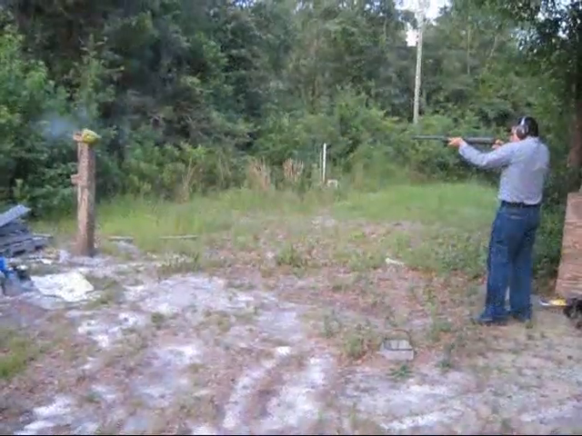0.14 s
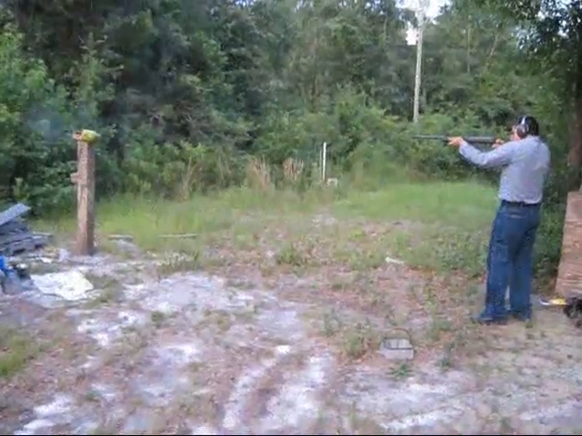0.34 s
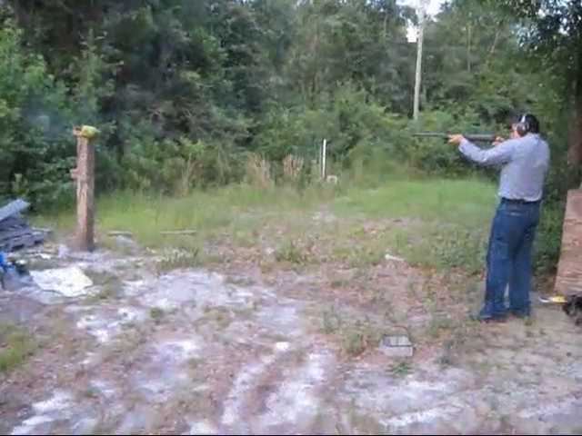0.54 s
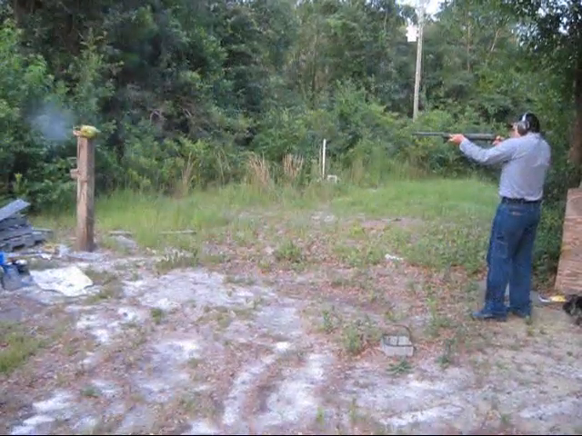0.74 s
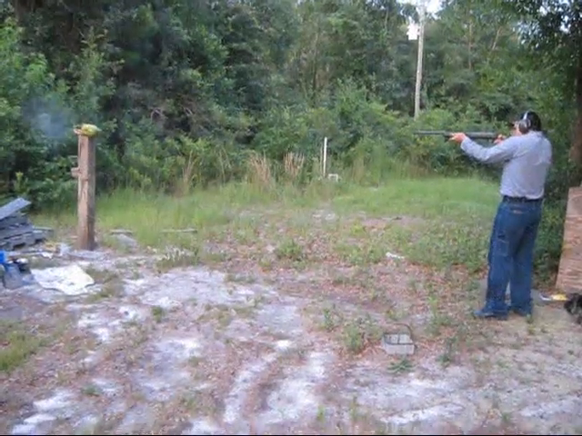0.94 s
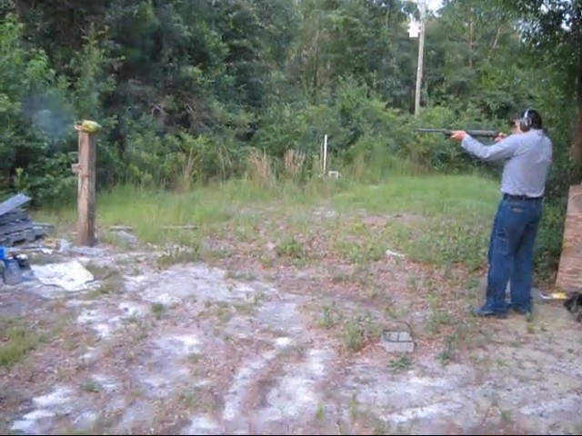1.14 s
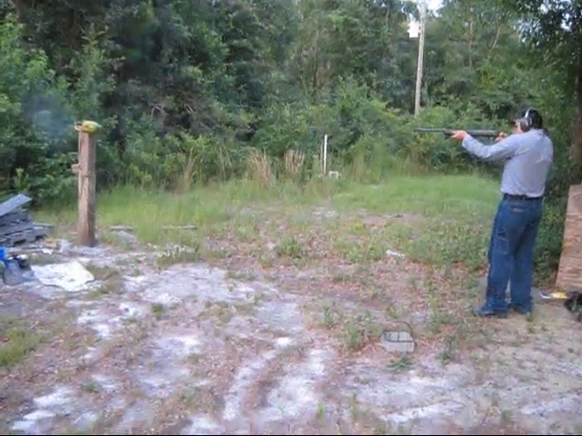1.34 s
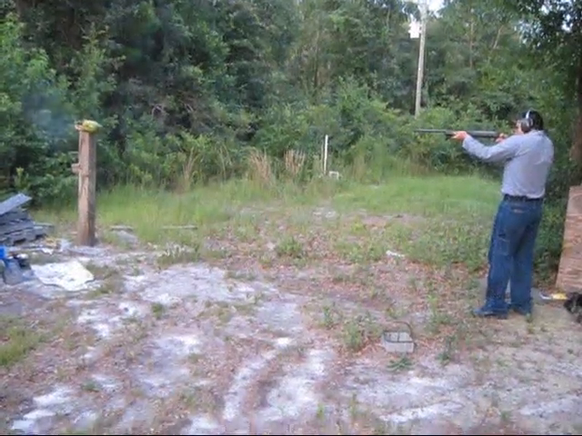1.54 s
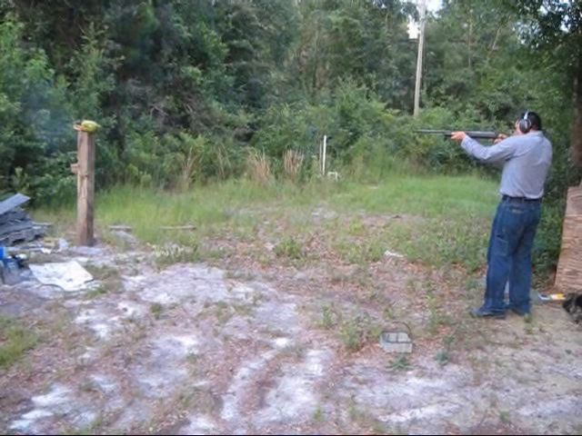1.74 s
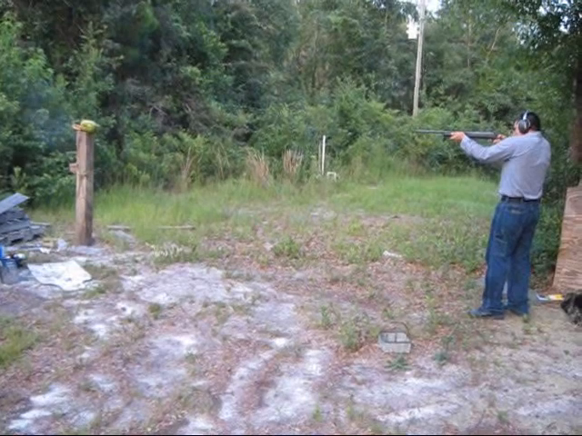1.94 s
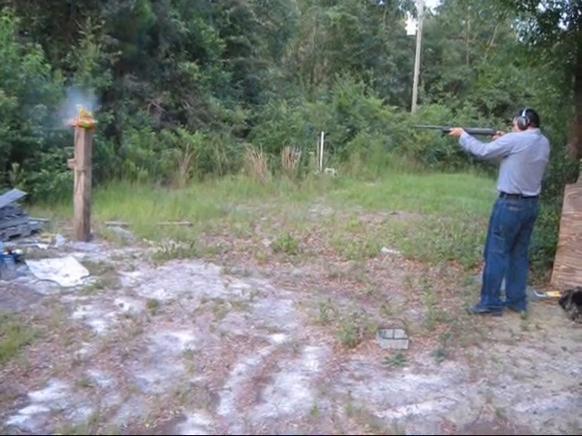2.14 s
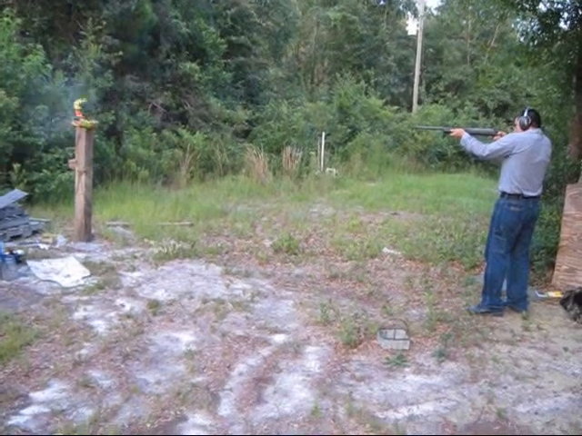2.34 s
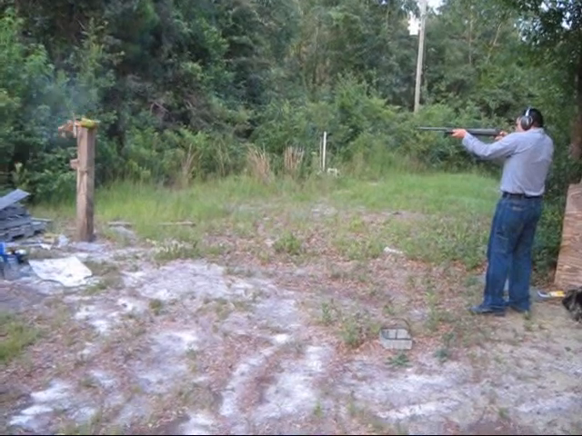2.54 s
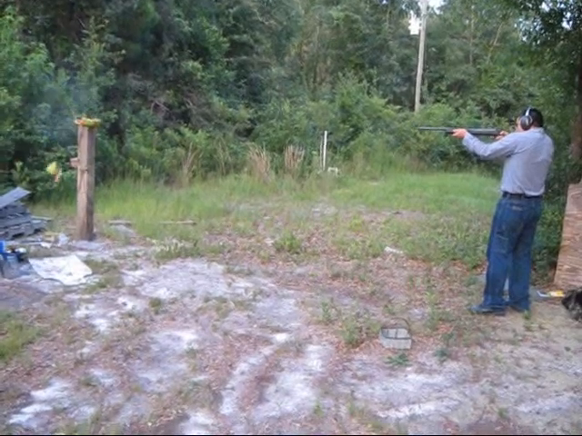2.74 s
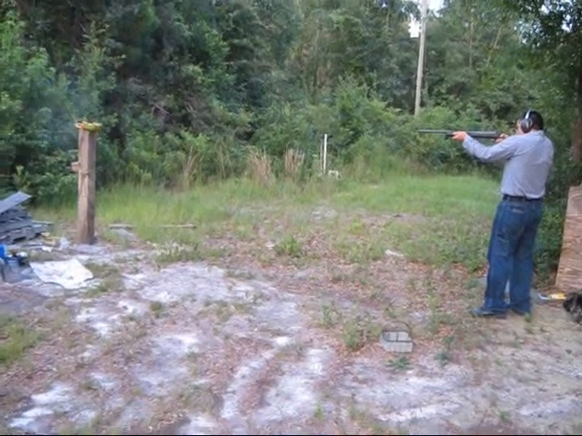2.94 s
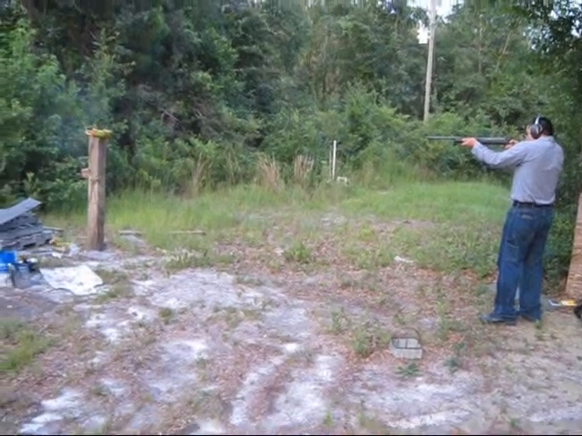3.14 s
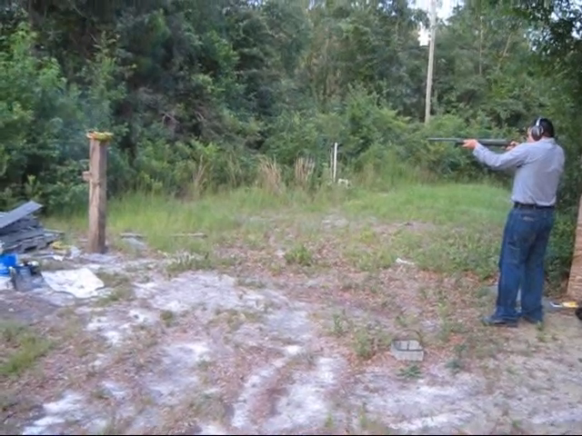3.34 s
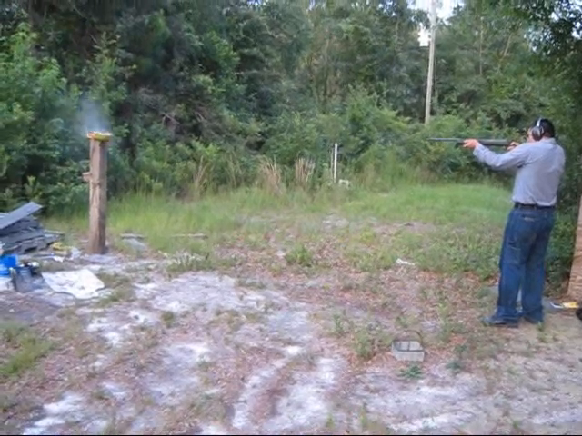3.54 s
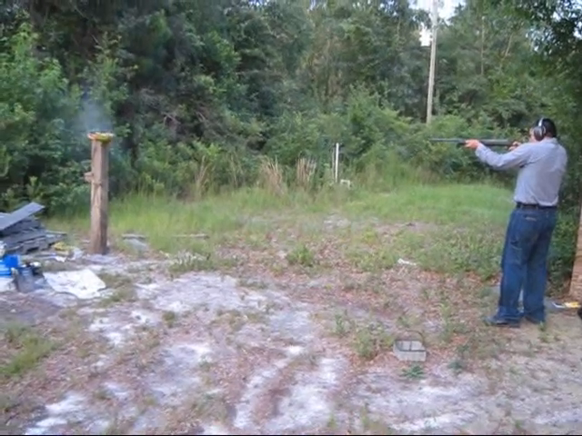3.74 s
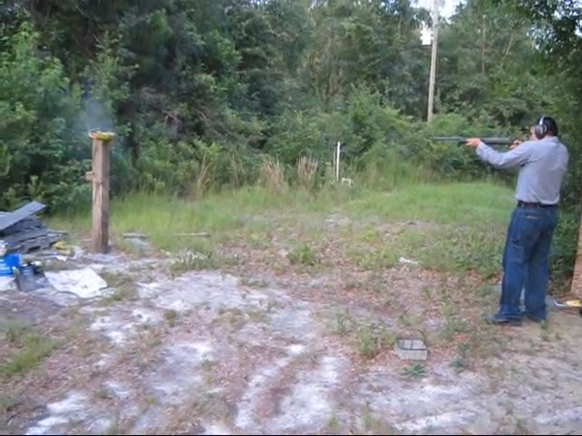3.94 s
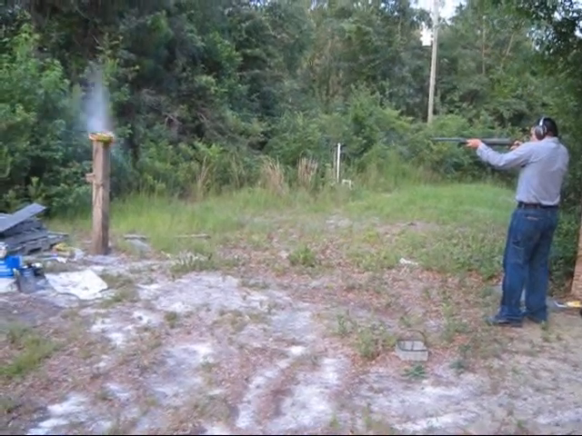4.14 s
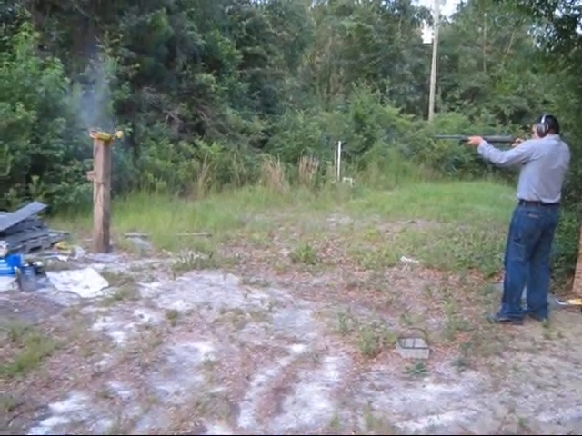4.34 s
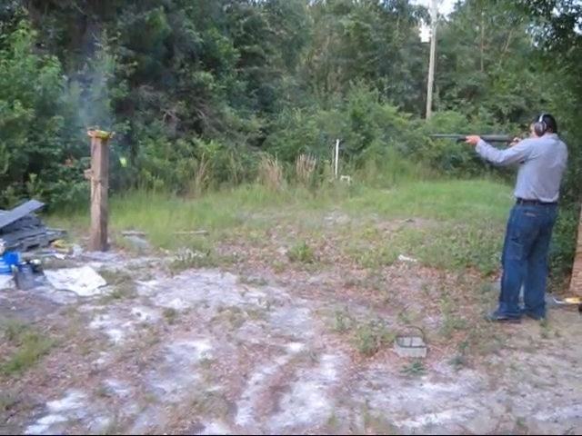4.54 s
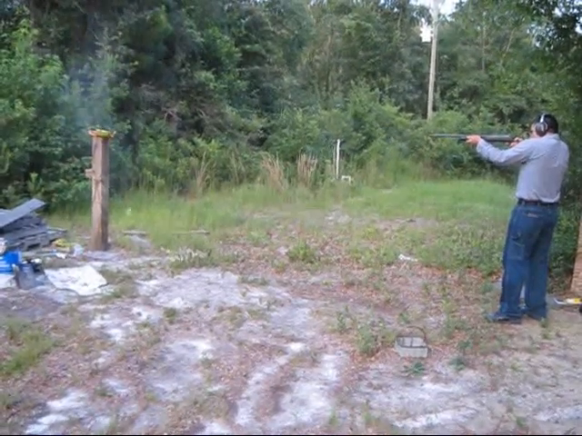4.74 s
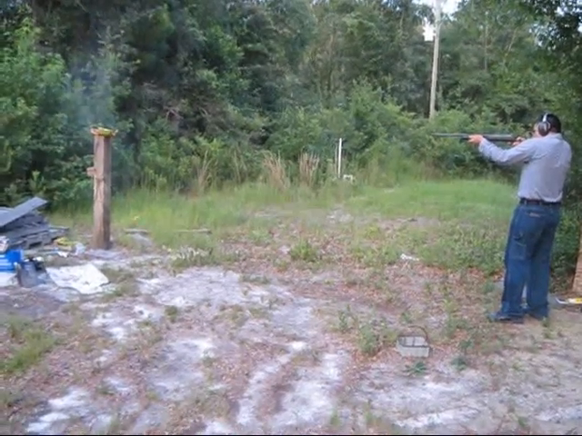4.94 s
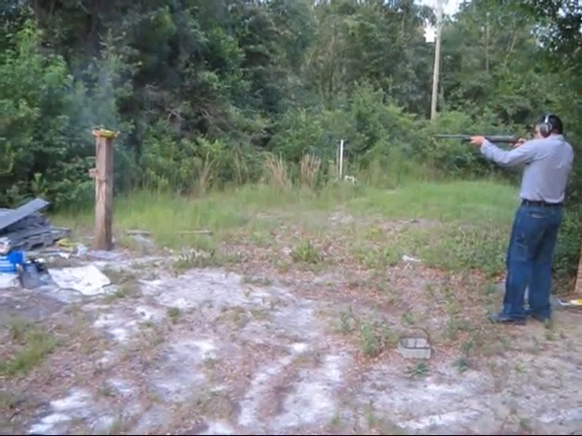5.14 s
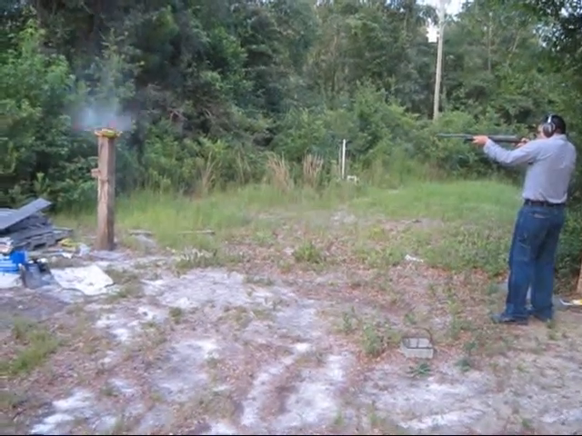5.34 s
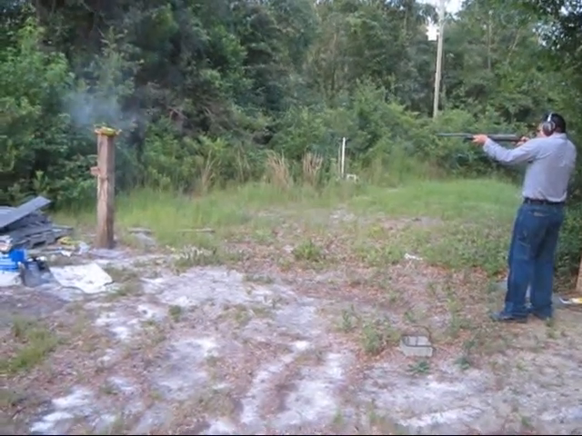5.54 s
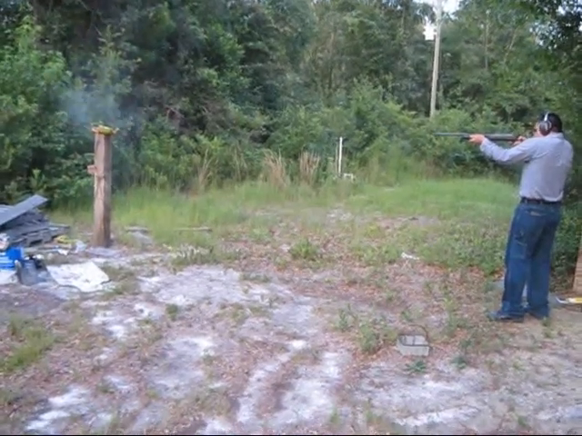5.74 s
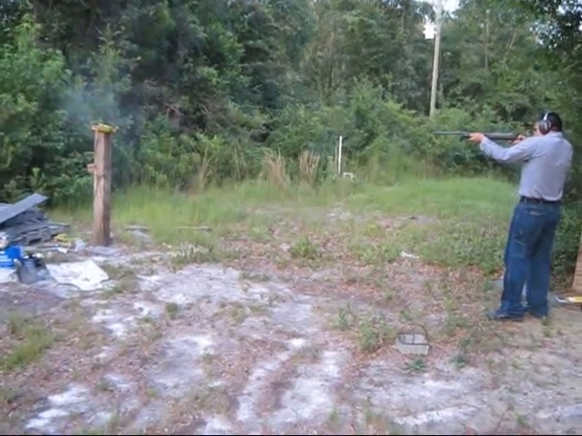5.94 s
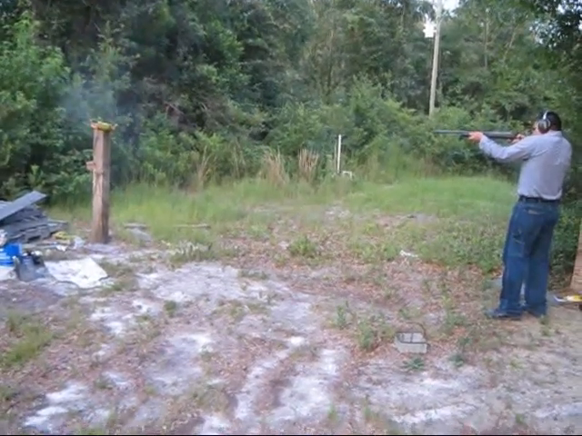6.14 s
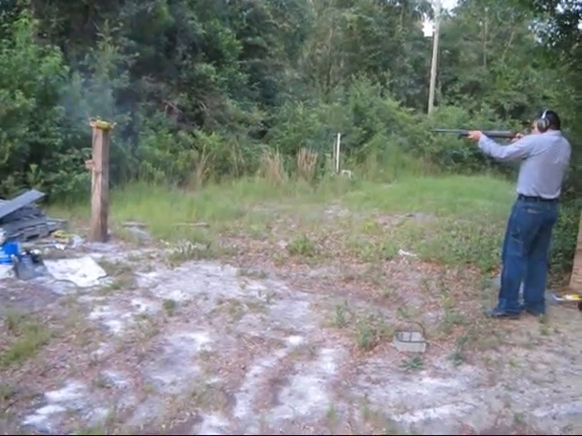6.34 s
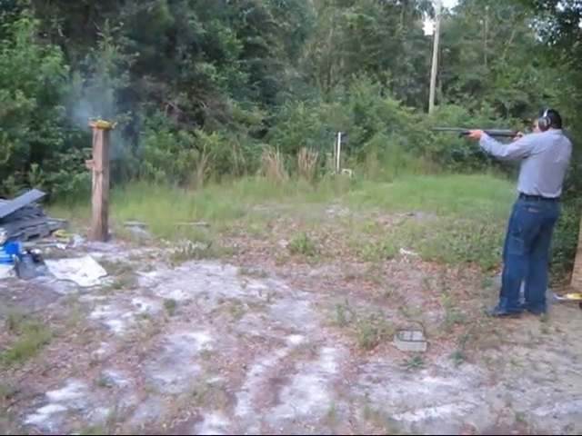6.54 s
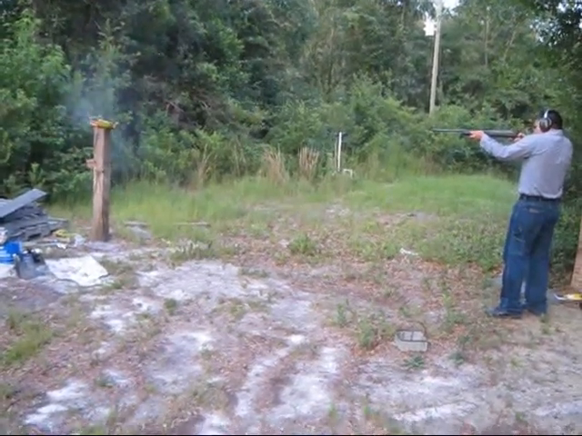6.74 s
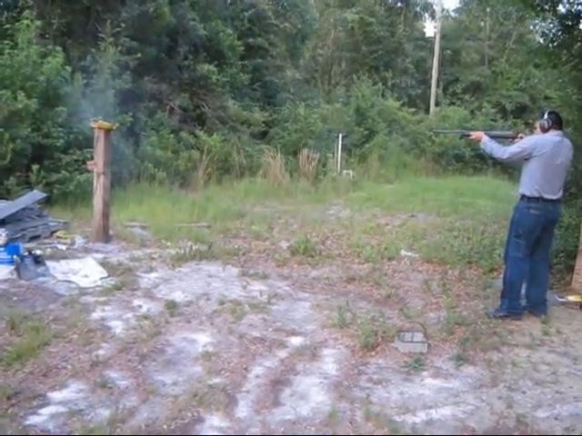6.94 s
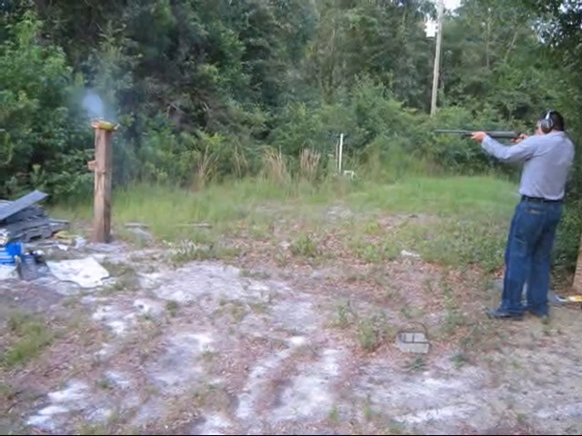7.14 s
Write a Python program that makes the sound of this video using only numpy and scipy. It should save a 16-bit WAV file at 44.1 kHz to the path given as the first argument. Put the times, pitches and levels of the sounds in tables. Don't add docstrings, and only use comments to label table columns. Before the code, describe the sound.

Nine sharp small-rifle shots crack in a wooded yard, each slapping off nearby surfaces and washing back from the trees, with small ticks between.

```python
import sys
import numpy as np
from scipy import signal
from scipy.fft import rfft, irfft
from scipy.io import wavfile
from scipy.ndimage import uniform_filter1d

SR = 44100
rng = np.random.default_rng(int(sys.argv[2]) if len(sys.argv) > 2 else 0)


def bounce(signal):
    frames = np.transpose(np.atleast_2d(signal))
    limited = np.clip(frames, -1, 1)
    pcm = np.round(limited * 32767).astype(np.int16)
    wavfile.write(sys.argv[1], SR, pcm)


def ratio_of_db(decibels):
    return 10 ** (np.asarray(decibels, float) / 20)


N = 317520

# f/Hz, density/dB per Hz
WASH_SPECTRUM = [(150, -66), (250, -29.5), (345, -21.5), (435, -14.5), (656, 0), (977, -1.5), (1310, -4.5),
                 (1510, -6.5), (1650, -6), (2030, -5), (3440, -12.5), (4940, -18.5), (5400, -16),
                 (7020, -65.5), (11900, -120)]
WASH_LIMITS_HZ = 1200, 2850, 6500
# f/Hz, density/dB per Hz
RUMBLE_SPECTRUM = [(13, -31), (22, -9.5), (27, -5), (39, -3), (54, -4), (108, -7.5), (144, -10),
                   (193, -6.5), (293, -9.5), (450, 0), (580, -23), (990, -120)]
# echo/dB, swell/s, T60/s, steady/dB
WOODS_RANGES = [
    (-14, 0.33, 3.01, -43.5),
    (-12.5, 0.12, 2.85, -47),
    (-14.5, 0.043, 1.53, -47.5),
    (-17, 0.063, .85, -38),
    (-25.5, 0.034, 0.55, -50),
]
# t/s, insect chorus/dB, breeze and traffic/dB
SWELLS = [(0, -8, 2.5), (1.2, -7.5, -4.5), (2.2, -0.5, -2), (2.85, 3, 4), (3.2, 4.5, 3.5),
          (3.6, -1.5, -1.5), (4.6, 1.5, -2), (5.2, 0, 2), (5.75, -0.5, -2), (6.05, 3.5, 4), (6.5, -4, -3),
          (7.2, 3, -1)]
# f/Hz, width/Hz, level/dB
CHORUS_BANDS = [(4070, 500, -2), (4596, 770, 3.5), (4970, 260, -4), (5526, 900, -7.5)]
# f/Hz, width/Hz, level/dB
CRICKET_BANDS = [(4450, 110, -4), (4970, 97, 0), (2380, 71, -8)]
CRICKET_START_S, CRICKET_SWELL_S, CRICKET_DB = 5.85, .25, -39.5
# t/s, f/Hz, level/dB
MOTOR_COURSE = [(4.66, 274, -68), (4.74, 255, -57), (4.86, 211, -52), (4.95, 201, -68)]
# t/s, f/Hz, level/dB
WHINE_COURSE = [(5.95, 1800, -62), (6.1, 1775, -44.5), (6.25, 1690, -39.5), (6.5, 1646, -45),
                (6.53, 1670, -70)]
# t/s, gain just after/dB, recovery/dB per s, echo sent to woods/dB, extra bass/dB
DUCKS = [(-.4, -19.5, 19, -1, 1), (0.192, -23.5, 23, 0, -2), (0.738, -21.5, 21, -0.5, -2),
         (1.254, -22, 20.5, 5, -1), (2.222, -22.5, 20.5, -0.5, 3), (2.825, -18.5, 26.5, -60, 0),
         (3.578, -22.5, 21, 0.5, -0.5), (4.219, -20.5, 18, -1.5, 2), (5.391, -20, 19, 0, -1.5),
         (6.52, -21, 21.5, 0, -1.5), (7.193, -13, 20, 0, 0)]
# t/s, peak/dB, ring f/Hz, body/dB, low knock/dB
CONTACTS = [(1.8905, -20, 3230, -26, -53), (2.8228, -11.5, 3720, -26, -33), (2.9936, -31, 4760, -33.5, -52),
            (3.02, -33, 4140, -29, -36), (3.045, -23, 5350, -41, -56), (3.052, -26, 4640, -48, -45),
            (3.1442, -26, 4580, -28, -41), (4.103, -18, 3480, -30, -53), (4.753, -21, 4500, -35, -54),
            (4.762, -23, 3620, -26.5, -56), (4.9152, -20, 4700, -28, -33), (4.92, -18.5, 4740, -42.5, -32),
            (4.997, -15.5, 3660, -29, -47), (5.0749, -16.5, 4690, -35, -39), (6.283, -32, 2650, -26.5, -48),
            (6.9574, -16.5, 3700, -43, -61), (7.06, -35, 4970, -44, -58)]
CONTACT_T60_S = .019
# t/s, thump/dB, slap ring f/Hz, ring/dB, scatter/dB
RIFLE_SHOTS = [(.191, -18.5, 2100, -11.5, -22), (.737, -18, 700, -11, -20.5),
               (1.255, -25, 1800, -33, -15.5), (2.222, -11, 660, 0.5, -21.5),
               (3.578, -16.5, 1600, -19.5, -21), (4.2205, -10, 780, -11, -19.5),
               (5.391, -7.5, 2450, -16, -21), (6.5199, -11, 1570, -14.5, -20.5),
               (7.193, -17, 1760, -21, -17)]
# delay/s, rise/s, T60/s
PATHS = [(-.0105, .0005, .012), (-.003, .0015, .03), (0, .001, .014), (.006, .001, .04),
         (.0105, .0007, .018), (.0135, .001, .07), (.023, .001, .03), (.026, .004, .12),
         (.0555, .0003, .012), (.058, .002, .1), (.067, .002, .1), (.186, .001, .05), (.226, .002, .05)]
# level/dB, centre f/Hz, width/Hz
PATH_COLOURS = [(-9, 3600, 1000), (-2, 630, 1800), (8.5, 580, 6100), (-4, 2900, 5500), (1.5, 1800, 3900),
                (4, 1460, 3600), (1.5, 1470, 6500), (-1.5, 3840, 2300), (1, 2260, 1000), (-8.5, 2700, 980),
                (-5.5, 1900, 3900), (-14, 1500, 4600), (-23, 500, 1800)]
LEAD_S, PATHS_DB = .012, -11.5
# noise index, low f/Hz, high f/Hz, level/dB, delay/s, rise/s, T60/s
SCATTER_BANDS = [(0, 1600, 3500, 0, .025, .025, .52), (1, 3000, 6500, -1.5, .03, .0033, .4992),
                 (2, 32, 600, -9, .01, .0016, .26), (2, 550, 1300, -12, .04, .02, .52),
                 (1, 1200, 2600, -6, .08, .03, .3328)]
HOLD_SAMPLES, STEP, OFFSET = 4, 1 / 128, -.0059
OVERLOAD, OUTPUT_CUTOFF_HZ = .4, 15550


def rms_one(x):
    return x / np.sqrt(np.mean(x ** 2) + 1e-20)


def band(x, low_hz, high_hz, order=2):
    limits_hz = [max(low_hz, 10), min(high_hz, 9000)]
    return signal.sosfilt(signal.butter(order, limits_hz, "band", fs=SR, output="sos"), x)


def resonance(x, hz, width_hz):
    r = np.exp(-np.pi * width_hz / SR)
    zeros = np.array([1, 0, -1]) * (1 - r * r) / 2
    return signal.lfilter(zeros, [1, -2 * r * np.cos(2 * np.pi * hz / SR), r * r], x)


def burst(t, rise_s, t60_s):
    t = np.maximum(t, 0)
    return (1 - np.exp(-(t / max(rise_s, 1e-4)) ** 2)) * ratio_of_db(-60 * t / max(t60_s, .004))


def puff(noise, envelope):
    return rms_one(noise * envelope) * np.sqrt(np.mean(envelope ** 2))


def drift(rate_hz):
    r = np.exp(-80 * np.pi * rate_hz / SR)
    slow = signal.lfilter([1], [1, -2 * r, r * r], rng.standard_normal(N // 40 + 2002))[2000:]
    return np.interp(np.arange(N) / 40, np.arange(len(slow)), rms_one(slow))


def coloured(spectrum, low_hz, high_hz, patchy_db):
    hz = np.maximum(np.fft.rfftfreq(N, 1 / SR), 1)
    point_hz, point_db = np.transpose(spectrum)
    shape = ratio_of_db(np.interp(np.log(hz), np.log(point_hz), point_db))
    shape = shape / np.sqrt((1 + (low_hz / hz) ** 12) * (1 + (hz / high_hz) ** 12))
    noise = irfft(rfft(rng.standard_normal(N)) * shape, N)
    return rms_one(noise * ratio_of_db(patchy_db * (drift(25) + .6 * drift(90))))


def add(out, at_s, sound):
    i = round(at_s * SR)
    out[i:i + len(sound)] += sound[:N - i]


def camera_gain_db(t):
    s, after_db, db_per_s, *_ = np.transpose(DUCKS)
    last = np.maximum(np.searchsorted(s, t, "right") - 1, 0)
    return uniform_filter1d(after_db[last] + db_per_s[last] * (t - s[last]), size=200)


def woods_level(woods_range, swell_db, bass_share=0):
    echo_db, rise_s, t60_s, steady_db = woods_range
    t = np.arange(0, N, 40) / SR
    power = np.zeros(len(t))
    for s, _, _, sent_db, bass_db in DUCKS:
        power += (ratio_of_db(echo_db + sent_db + bass_share * bass_db) * burst(t - s, rise_s, t60_s)) ** 2
    return np.sqrt(np.interp(np.arange(N) / SR, t, power) + ratio_of_db(steady_db + swell_db) ** 2)


def rumble(breeze_db):
    return woods_level(WOODS_RANGES[4], breeze_db) * ratio_of_db(3) * coloured(RUMBLE_SPECTRUM, 12, 450, 1.2)


def drone(course, wobble_hz):
    s, hz, db = np.transpose(course)
    t = np.arange(N) / SR
    turns = np.cumsum(np.interp(t, s, hz) + wobble_hz * drift(60)) / SR
    return ratio_of_db(np.interp(t, s, db, -120, -120) + 2 * drift(18)) * np.sin(2 * np.pi * turns)


def singers(bands):
    out = np.zeros(N)
    for hz, width_hz, db in bands:
        white = rng.standard_normal(N)
        out += ratio_of_db(db) * rms_one(resonance(resonance(white, hz, width_hz), hz, width_hz))
    return out


def insects(t, chorus_db):
    chorus = woods_level(WOODS_RANGES[3], chorus_db) * ratio_of_db(-3.5) * singers(CHORUS_BANDS)
    swell = ratio_of_db(CRICKET_DB) * burst(t - CRICKET_START_S, CRICKET_SWELL_S, np.inf)
    return chorus + swell * singers(CRICKET_BANDS)


def woods_wash(chorus_db, breeze_db):
    low_hz, high_hz, top_hz = WASH_LIMITS_HZ
    low = woods_level(WOODS_RANGES[0], breeze_db, bass_share=1)
    middle = woods_level(WOODS_RANGES[1], breeze_db)
    high = woods_level(WOODS_RANGES[2], chorus_db) * ratio_of_db(2.5)
    wash = low * coloured(WASH_SPECTRUM, 140, low_hz, 1.6)
    wash += middle * coloured(WASH_SPECTRUM, low_hz, high_hz, 1.2)
    return wash + high * coloured(WASH_SPECTRUM, high_hz, top_hz, .91)


def surroundings():
    t = np.arange(N) / SR
    s, chorus_db, breeze_db = np.transpose(SWELLS)
    chorus_db, breeze_db = np.interp(t, s, chorus_db), np.interp(t, s, breeze_db)
    place = rumble(breeze_db) + insects(t, chorus_db) + woods_wash(chorus_db, breeze_db)
    return ratio_of_db(camera_gain_db(t)) * place + drone(MOTOR_COURSE, 4) + drone(WHINE_COURSE, 7.4)


def ticks():
    out, t = np.zeros(N), np.arange(SR // 10) / SR
    for s, db, hz, body_db, knock_db in CONTACTS:
        white = rng.standard_normal((2, len(t)))
        dies = ratio_of_db(-60 * t / CONTACT_T60_S) + ratio_of_db(-17 - 60 * t / .14)
        click = .37 * np.sin(2 * np.pi * hz * t) * dies + .52 * puff(band(white[0], 2400, 5900), dies)
        body = ratio_of_db(body_db + .5) * puff(band(white[1], 440, 2000), ratio_of_db(-60 * t / .032))
        knock = ratio_of_db(knock_db + .5) * np.sin(2 * np.pi * 130 * t) * burst(t, .00085, .027)
        add(out, s, ratio_of_db(db - 4.5) * click + body + knock)
    return out


def scatter(t):
    noise = rng.standard_normal((3, len(t)))
    tail = np.zeros(len(t))
    for i, low_hz, high_hz, db, delay_s, rise_s, t60_s in SCATTER_BANDS:
        tail += ratio_of_db(db) * rms_one(band(noise[i], low_hz, high_hz)) * burst(t - delay_s, rise_s, t60_s)
    return tail


def slap(t, ring_hz):
    after = t - .0145
    envelope = burst(after, .00045, .047) * np.exp(-(np.maximum(after, 0) / .0084) ** 4)
    noise = band(rng.standard_normal(len(t)), 605, 785)
    return np.sin(2 * np.pi * ring_hz * t) * envelope + .5 * puff(noise, envelope)


def thump(t):
    push = -np.clip(t / .0004, -1, 1) * np.exp(-(t / np.where(t < 0, .003, .002)) ** 2)
    return push - ratio_of_db(-8) * np.roll(push, round(.0155 * SR))


def crack(t):
    flicker = ratio_of_db(2.2 * rms_one(band(rng.standard_normal(len(t)), 100, 600)))
    out = np.zeros(len(t))
    for (delay_s, rise_s, t60_s), (db, hz, width_hz) in zip(PATHS, PATH_COLOURS):
        noise = resonance(rng.standard_normal(len(t)) * flicker, hz, width_hz)
        level = ratio_of_db(PATHS_DB + db + 1.1 * rng.standard_normal())
        out += level * puff(noise, burst(t - delay_s, rise_s, t60_s))
    return band(out, 320, 9000, order=1)


def shots():
    out, t = np.zeros(N), np.arange(SR // 2) / SR - LEAD_S
    for s, thump_db, ring_hz, ring_db, scatter_db in RIFLE_SHOTS:
        sound = crack(t) + ratio_of_db(thump_db - 7.5) * thump(t)
        sound += ratio_of_db(ring_db) * slap(t, ring_hz) + ratio_of_db(scatter_db) * scatter(t)
        add(out, s - LEAD_S, sound)
    return out


def scene():
    return np.tile(surroundings() + ticks() + shots(), (2, 1))


def starved(x):
    away_hz = np.abs(np.fft.rfftfreq(N, 1 / SR) - SR / HOLD_SAMPLES)
    t, spectrum = np.arange(N) / SR, rfft(x)
    busy = sum((t > row[0] + .045) * (t < row[0] + .24) for row in RIFLE_SHOTS) * 1.
    busy = uniform_filter1d(busy, size=400)
    core = irfft(spectrum * (away_hz < 330), N)
    skirts = irfft(spectrum * (away_hz >= 330) * (away_hz < 650), N)
    return x - core - busy * skirts


def top_cut(x):
    return signal.sosfilt(signal.butter(12, 16790, fs=SR, output="sos"), x)


def record(dry):
    smooth = signal.sosfilt(signal.butter(3, 6300, fs=SR, output="sos"), dry)
    clipped = smooth / (1 + (smooth / OVERLOAD) ** 4) ** .25
    coarse = np.round(clipped[:, ::HOLD_SAMPLES] / STEP) * STEP + OFFSET
    held = starved(np.repeat(coarse, HOLD_SAMPLES, axis=1)[:, :N])
    low_pass = signal.ellip(12, .2, 100, OUTPUT_CUTOFF_HZ, fs=SR, output="sos")
    mix = signal.sosfilt(low_pass, held)
    return top_cut(mix)


dry = scene()
out = record(dry)
bounce(out)
```